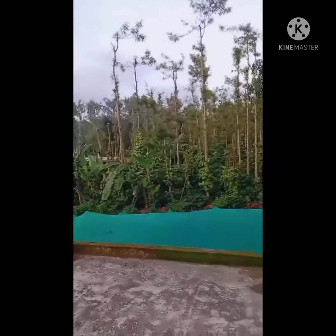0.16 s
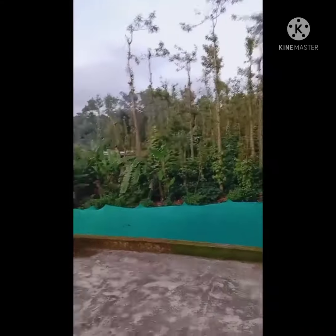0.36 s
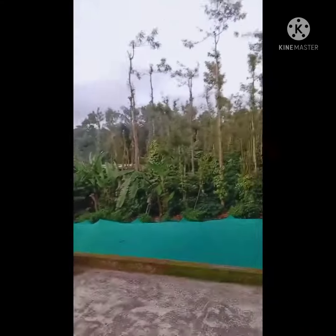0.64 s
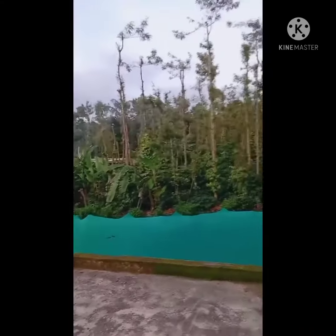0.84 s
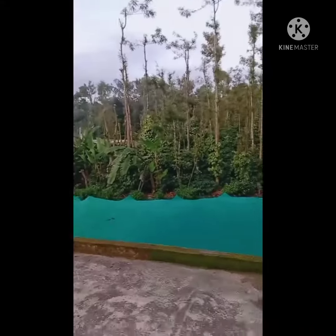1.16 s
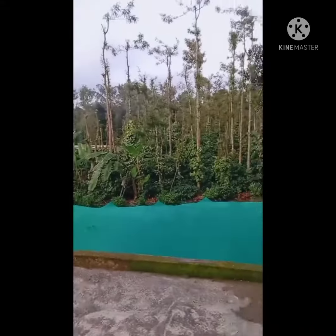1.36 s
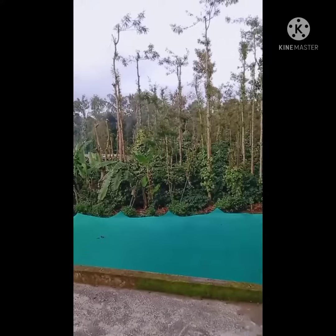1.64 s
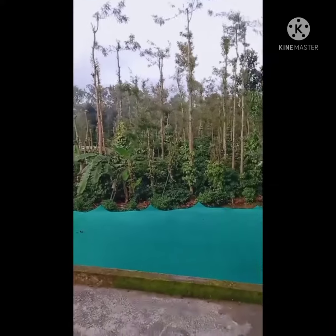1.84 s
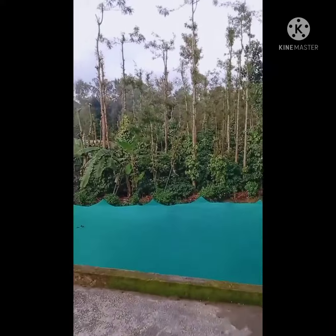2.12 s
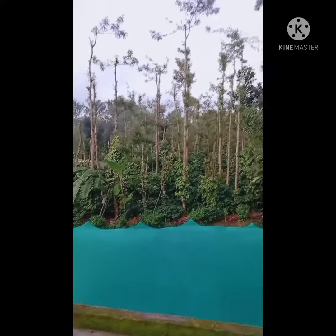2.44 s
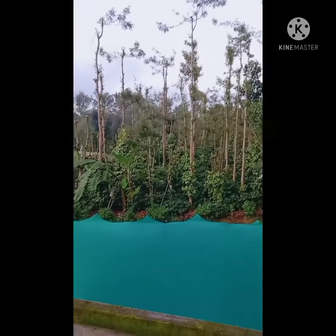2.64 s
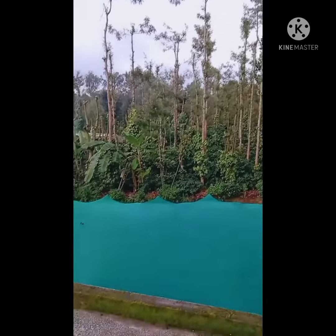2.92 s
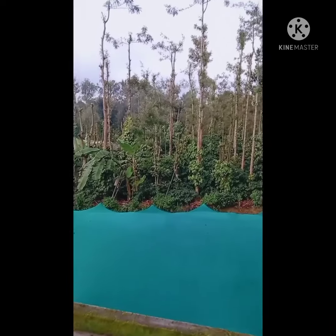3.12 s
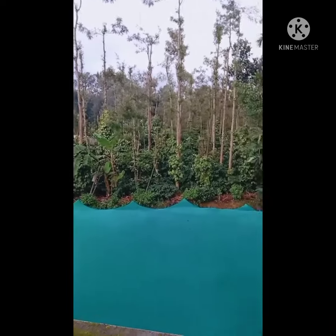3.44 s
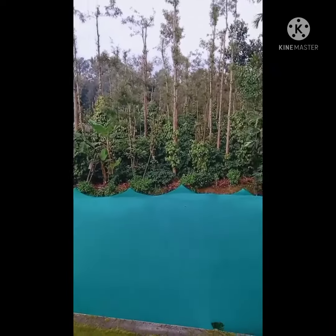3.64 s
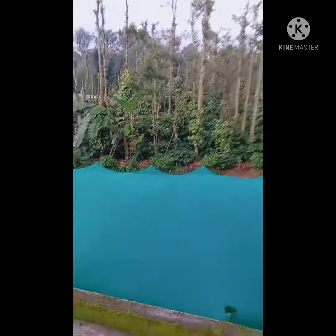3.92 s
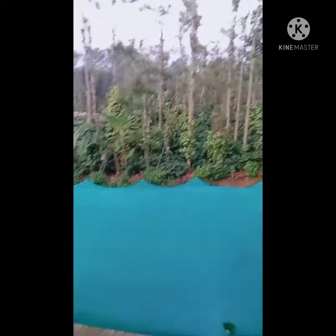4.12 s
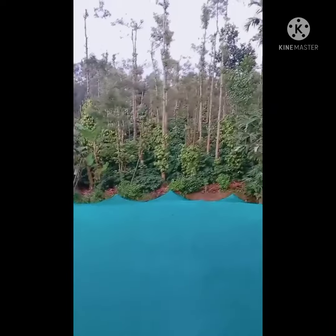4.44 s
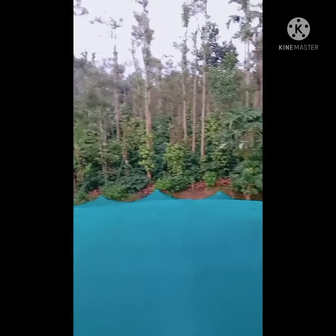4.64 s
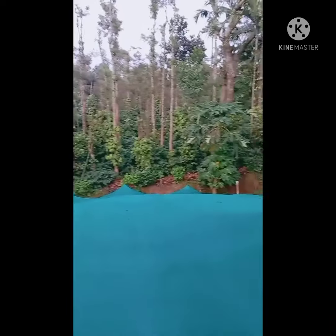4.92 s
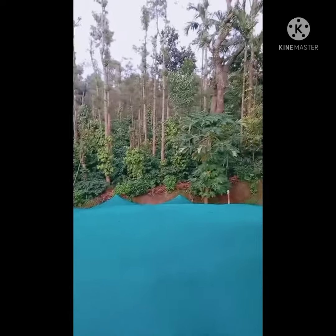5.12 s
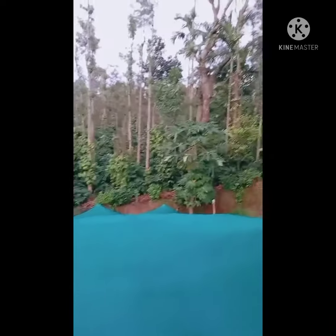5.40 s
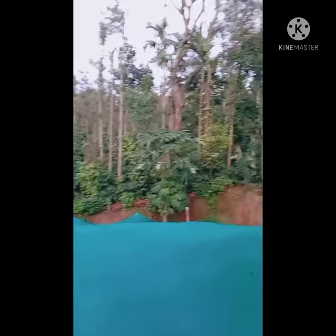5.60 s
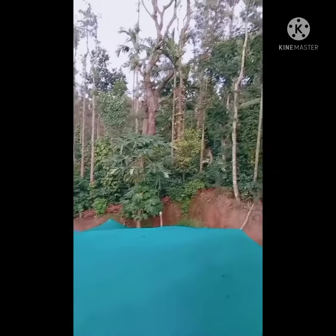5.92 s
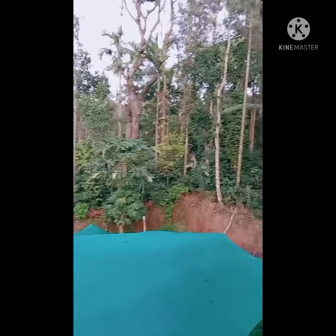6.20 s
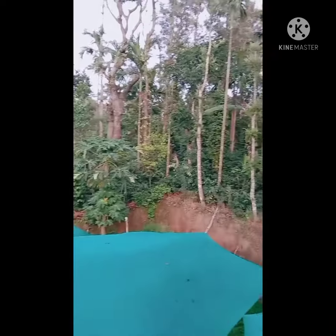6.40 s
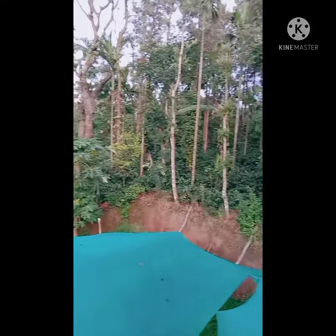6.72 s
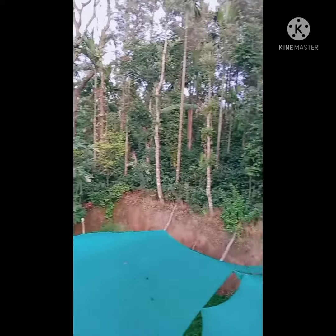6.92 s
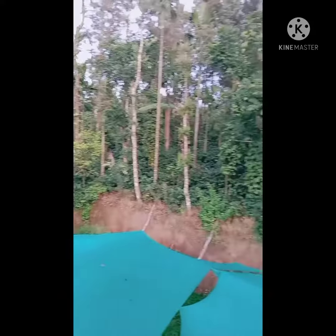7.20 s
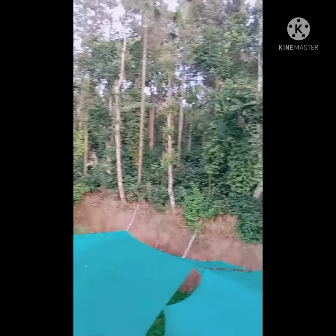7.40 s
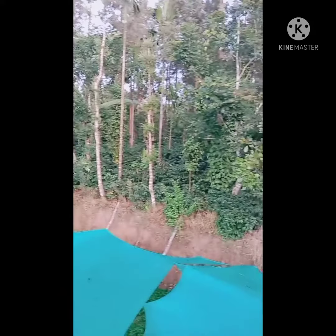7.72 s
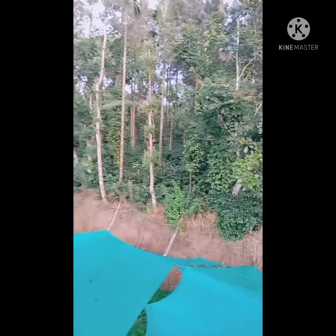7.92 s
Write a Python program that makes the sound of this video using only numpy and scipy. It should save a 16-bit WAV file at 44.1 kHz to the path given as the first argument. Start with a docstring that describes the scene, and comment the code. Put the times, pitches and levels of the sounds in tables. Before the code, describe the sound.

A steady, high-pitched insect chorus shrills outdoors, with a few low muffled thumps of wind and handling on the microphone.

```python
"""Insect chorus at dusk in trees around a yard, heard through one microphone of a hand-held phone.
Four crowds click into their body resonances, from low to very high; two narrow voices stand out.
A finger slides off the port at the start; gusts and the grip buffet the port in low thumps.
Faint far hoots, light finger taps on the case and two sharp ticks come through."""
import sys
import numpy as np
from scipy import signal
from scipy.fft import rfft, irfft, next_fast_len
from scipy.io import wavfile
from scipy.ndimage import uniform_filter1d

SR = 44100
rng = np.random.default_rng(int(sys.argv[2]) if len(sys.argv) > 2 else 0)


def unload_audio(sound):
    """Save the sound as a 16-bit wav file, at the path given as the first command line argument."""
    columns = np.transpose(np.atleast_2d(sound))
    # keep every value between -1 and 1, then stretch to whole-number steps
    steps = np.round(np.clip(columns, -1, 1) * 32767)
    wavfile.write(sys.argv[1], SR, steps.astype(np.int16))


N = 355093

# lower middle crowd, throbbing and swelling as the phone turns to the trees: (time [s], level [dB])
LOWER_MID_LEVELS = [(0.42, -28), (0.82, -34.5), (1.52, -32.5), (1.59, -34.5), (2.39, -32.5), (2.5, -25.5),
                    (2.54, -30.5), (3.46, -31), (3.48, -33), (3.61, -26.5), (3.63, -32.5), (3.99, -33),
                    (4.09, -26), (4.58, -32.5), (4.73, -27.5), (4.75, -30), (5.11, -32.5), (5.31, -29),
                    (7.71, -28), (7.81, -30.5), (8.01, -26), (8.05, -28.5)]


def from_db(db):
    return 10 ** (np.asarray(db) / 20)


def unit_rms(x):
    return x / np.sqrt(np.mean(x ** 2) + 1e-20)


def curves(rows):
    """Rows of (time [s], values...) to one per-sample curve per value column."""
    times_s, *columns = np.transpose(rows)
    return [np.interp(np.arange(N) / SR, times_s, column) for column in columns]


def at_hz(rows, hz, column=1):
    rows = np.array(rows)
    return np.interp(np.log(hz), np.log(rows[:, 0]), rows[:, column])


def butter(x, order, hz, kind):
    return signal.sosfilt(signal.butter(order, hz, kind, fs=SR, output="sos"), x)


def drift(rate_hz):
    """Slow random wander, unit RMS."""
    step, settle = 40, 2000
    pole = np.exp(-2 * np.pi * rate_hz * step / SR)
    noise = rng.standard_normal(N // step + settle + 2)
    slow = signal.lfilter([1], [1, -2 * pole, pole * pole], noise)[settle:]
    return np.interp(np.arange(N) / step, np.arange(len(slow)), unit_rms(slow))


def coloured(x, spectrum):
    """FFT of x shaped by the table, and the bin frequencies."""
    size = next_fast_len(N)
    hz = np.maximum(np.arange(size // 2 + 1) * SR / size, 1)
    return rfft(x, size) * from_db(at_hz(spectrum, hz)), hz


def ring(drive, hz, t60_s):
    """Resonator: a unit click starts a decaying unit sine."""
    radius, angle = from_db(-60 / (t60_s * SR)), 2 * np.pi * hz / SR
    return signal.lfilter([0, np.sin(angle)], [1, -2 * radius * np.cos(angle), radius ** 2], drive + 1e-18)


def swell(start_s, hold_s, db, rise_db_per_s, fall_db_per_s):
    """Rise to start_s, hold, fall; linear in dB."""
    t = np.arange(N) / SR - start_s
    return from_db(db - rise_db_per_s * np.maximum(-t, 0) - fall_db_per_s * np.maximum(t - hold_s, 0))


def swing(t, hz, width_cycles):
    """Rounded sine pulse centred one cycle in."""
    onset = np.sin(np.pi / 2 * np.minimum(t * hz * 1.5, 1)) ** 2
    bell = np.exp(-((t * hz - 1) / width_cycles) ** 2)
    return onset * bell * np.sin(2 * np.pi * hz * t + rng.uniform(0, 2 * np.pi))


def covered(lag_s):
    # finger over the port: (time [s], cover [0-1])
    cover = [(0, 0.93), (.24, 0.97), (.31, 0.62), (.345, 0.42), (.38, .0), (9, 0.02)]
    return np.interp(np.arange(N) / SR - lag_s, *np.transpose(cover))


def clicking(count, clicks_per_s, spread_db, blur):
    """Each insect clicks at its own uneven rate and distance; far ones blur into hiss."""
    out, beats = np.zeros(N), int(1.3 * clicks_per_s * N / SR)
    for _ in range(count):
        gaps = SR / clicks_per_s * rng.uniform(.85, 1.15) * (1 + .06 * rng.standard_normal(beats))
        at = (np.cumsum(gaps) - gaps[0] * rng.random()).astype(int)
        at = at[at < N]
        out[at] += from_db(spread_db * rng.standard_normal()) * rng.standard_normal(len(at))
    return unit_rms(unit_rms(out) + blur * rng.standard_normal(N))


def crowd(clicks, spectrum, level_db, patchy_db, flicker_db):
    """Clicks through body resonances; each third octave swells alone and is muffled by the finger."""
    # covered port: (frequency [Hz], loss [dB], clearing lag [s])
    cover_loss = [(990, 5.2, 0.012), (2490, 7.8, 0), (3350, 12.4, .0), (3900, 43, 0), (5030, 31, 0),
                  (6300, 52, 0.053), (7300, 58, 0.084), (10000, 27, 0.033), (15000, 42, .085)]
    low_hz, high_hz = spectrum[0][0], spectrum[-1][0]
    shaped, hz = coloured(clicks, spectrum)
    shaped[(hz < low_hz) | (hz > high_hz)] = 0
    rms = np.sqrt(np.mean(irfft(shaped)[:N] ** 2))
    out = 0
    for third in np.arange(3 * np.log2(low_hz), 3 * np.log2(high_hz) + 1):
        centre_hz = 2 ** (third / 3)
        window = np.cos(np.pi / 2 * np.clip(3 * np.log2(hz) - third, -1, 1)) ** 2
        lag_s = at_hz(cover_loss, centre_hz, column=2)
        loss_db = covered(lag_s) * at_hz(cover_loss, centre_hz)
        out += irfft(shaped * window)[:N] * from_db(patchy_db * drift(9) - loss_db)
    return from_db(level_db + flicker_db * drift(14.5)) * out / rms


def chorus():
    """Four clicking crowds; the lower two share clicks, as do the high one and its lower skirt."""
    # body resonances: (frequency [Hz], density [dB])
    low_body = [(800, -53), (1000, -42.5), (1210, -36), (1350, -23), (1710, -8.5), (2350, -5.5), (2600, -5),
                (2800, -19.5), (3100, -31)]
    lower_mid_body = [(2450, -18), (2750, -8), (3000, -6), (3240, -4), (3700, -11.5), (4100, -17),
                      (4700, -38.5)]
    upper_mid_body = [(3600, -22), (4000, -13.5), (4400, -6.5), (4900, 0), (5810, -0.5), (6510, -9.5),
                      (7270, -12.5), (8140, -23), (10400, -31.5), (10900, -40.5), (12000, -39)]
    high_body = [(12800, -30), (13600, -21), (14100, -8), (14700, -3), (15150, 1), (15450, 4), (16000, -5)]
    skirt_body = [(10500, -26.5), (11200, -16.5), (12000, -4.5), (13000, 0), (13800, 0), (14600, -14)]
    # crowd loudness: (time [s], level [dB])
    low_levels = [(0.42, -30), (0.74, -34), (1.97, -33.5), (2.01, -33), (2.27, -36), (2.31, -31),
                  (2.39, -32.5), (4.31, -33.5), (7.99, -31), (8.05, -31.5)]
    upper_mid_levels = [(0.42, -26.5), (0.61, -34.5), (0.69, -29), (0.8, -32.5), (1.14, -30), (1.95, -32.5),
                        (2.03, -27), (2.27, -31.5), (2.52, -28.5), (2.61, -33.5), (2.67, -30),
                        (3.46, -27.5), (3.52, -32.5), (3.69, -29.5), (3.88, -31), (4.24, -25.5),
                        (4.33, -29), (5.2, -27.5), (5.31, -24.5), (5.41, -27), (6.22, -25.5), (6.33, -22.5),
                        (6.39, -26.5), (6.86, -25), (7.73, -25), (8.05, -24)]
    # high crowd: (time [s], level [dB], skirt re level [dB])
    high_levels = [(0.47, -52, -5), (0.53, -43, -10), (0.79, -64, -7), (0.93, -46, -13), (0.96, -54, -16),
                   (1.1, -44.5, -12), (1.46, -41.5, -10), (1.61, -38.5, -19), (2.39, -41.5, -13),
                   (2.52, -56, -15), (2.69, -50, -16), (3.4, -44, -12), (3.51, -52, -8), (3.57, -49, -20),
                   (3.78, -47, -12), (3.99, -41.5, -16), (4.27, -40.5, -15), (4.29, -45, -9),
                   (4.69, -40, -15), (5.22, -38, -11.5), (5.45, -41.5, -12), (6.49, -40, -12.5),
                   (7.4, -41, -9.5), (8.05, -40, -11)]
    # skirt flickers hard, then steadies: (time [s], depth [dB])
    skirt_flicker = [(0, 3.5), (4.7, 3), (5.3, 0.5), (8.05, 1)]
    high_db, skirt_db = curves(high_levels)
    low_clicks = clicking(count=30, clicks_per_s=130, spread_db=4.5, blur=1.8)
    high_clicks = clicking(count=14, clicks_per_s=240, spread_db=1, blur=1.5)
    out = crowd(low_clicks, low_body, curves(low_levels)[0], patchy_db=1.7, flicker_db=.57)
    out += crowd(low_clicks, lower_mid_body, curves(LOWER_MID_LEVELS)[0], patchy_db=1.13, flicker_db=.72)
    mid_clicks = clicking(count=30, clicks_per_s=250, spread_db=1.5, blur=1.84)
    out += crowd(mid_clicks, upper_mid_body, curves(upper_mid_levels)[0], patchy_db=1, flicker_db=.68)
    out += crowd(high_clicks, high_body, high_db, patchy_db=-.7, flicker_db=-.5)
    out += crowd(high_clicks, skirt_body, high_db + skirt_db,
                 patchy_db=1, flicker_db=curves(skirt_flicker)[0])
    return out


def narrow_band(hz, level_db, width_hz, throb_db, throb_hz=12):
    """Throbbing narrow noise on a fixed or moving centre."""
    baseband = butter(rng.standard_normal((2, N)), 2, width_hz / 2, "low")
    phase = 2 * np.pi * np.cumsum(hz + np.zeros(N)) / SR
    tone = unit_rms(baseband[0] * np.cos(phase) + baseband[1] * np.sin(phase))
    return tone * from_db(level_db + throb_db * drift(throb_hz))


def near_insects():
    """Two voices: the loud one wanders in pitch, the thin one swells with the lower middle crowd."""
    # loud voice: (time [s], level [dB])
    loud_levels = [(0.42, -36), (0.87, -39.5), (1.2, -32), (1.88, -35), (1.91, -31), (2.08, -28.5),
                   (2.12, -43), (2.29, -29.5), (2.33, -44), (2.39, -31), (2.52, -42), (2.63, -29),
                   (2.76, -36), (3.31, -29.5), (3.84, -35.5), (4.16, -26), (4.31, -37), (4.52, -27.5),
                   (4.67, -44), (4.78, -29.5), (4.88, -36), (5.31, -30), (7.22, -29), (7.26, -24.5),
                   (7.49, -31), (8.05, -28.5)]
    cover_db = 9.5 * covered(0)
    loud_hz = 2646 + 25.04 * drift(2)
    loud = narrow_band(loud_hz, curves(loud_levels)[0] - cover_db, width_hz=88, throb_db=1.2, throb_hz=11)
    crowd_db = curves(LOWER_MID_LEVELS)[0]
    thin_db = -37.5 + 1.3 * (crowd_db - crowd_db.mean()) - cover_db
    return loud + narrow_band(2927, thin_db, width_hz=59, throb_db=1.5)


def finger_leaks():
    """Gaps beside the covering finger pass thin bands of the chorus."""
    # gap bands: (centre [Hz], level [dB])
    bands = [(3650, -60), (4780, -63.5), (5480, -66.5), (6400, -78.5)]
    return covered(lag_s=.03) * sum(narrow_band(hz, db, width_hz=70, throb_db=.5) for hz, db in bands)


def background():
    """Faint, wavering low noise."""
    # noise floor: (frequency [Hz], density [dB])
    spectrum = [(15, -22), (30, -13.5), (69, -7.5), (189, -13.5), (266, -14), (412, -16.5), (551, -16),
                (1200, -16), (1560, -24), (2640, -120)]
    level = from_db(-71.5 + 1.2 * drift(2.5))
    shaped, _ = coloured(rng.standard_normal(N), spectrum)
    return level * unit_rms(irfft(shaped)[:N])


def finger_scrape():
    """Stick-slip: short hollow rasps over a weaker rub."""
    # finger slips: (time [s], level [dB])
    slips = [(.008, -47), (.071, -41), (.204, -59), (0.233, -40), (.249, -46.5), (0.281, -36), (.295, -50),
             (.333, -55), (.351, -28), (.385, -42)]
    times_s, db = np.transpose(slips)
    impulses = np.zeros(N)
    impulses[(times_s * SR).astype(int)] = from_db(db)
    pole = np.exp(-1 / (.0026 * SR))
    bursts = signal.lfilter([1 - pole], [1, -2 * pole, pole * pole], impulses) * np.e
    rub = swell(start_s=.36, hold_s=0, db=-39, rise_db_per_s=249, fall_db_per_s=175)
    rasp = butter(rng.standard_normal(N), 3, [380, 1150], "band")
    return (rub + bursts) * unit_rms(rasp)


def gust_rumble():
    """Turbulence at the port: lumpy low noise, duller in weak gusts."""
    # air at the port: (time [s], hold [s], drive [dB])
    gusts = [(.01, 0.01, -26.5), (0.077, 0.016, -32.5), (.1, .09, -51), (0.836, 0.018, -22.5),
             (0.965, 0.12, -23), (1.128, .13, -37.5), (1.3, .09, -71), (2.914, 0.037, -29),
             (3.028, 0.017, -35), (3.142, .07, -44.5), (3.36, 0.083, -50.5), (3.497, .07, -45),
             (3.6, .07, -61), (4.361, 0.13, -21), (4.53, 0.037, -34.5), (4.623, .14, -28),
             (4.802, 0.058, -50), (4.878, .08, -59), (5.82, .09, -40), (5.95, 0.047, -26.5),
             (6.059, 0.051, -24), (6.15, .15, -39.5), (6.372, 0.049, -51), (7.667, .015, -58),
             (7.82, 0.042, -58.5), (7.91, .08, -57)]
    # turbulence: (frequency [Hz], density [dB])
    spectrum = [(15, -45.5), (25, -27), (70, 1), (123, 0), (197, -7.5), (339, -28), (461, -36), (522, -37),
                (700, -55.5), (910, -79), (1540, -120)]
    split_hz, full_bright_db, dulling = 190, -28, .4
    level = sum(swell(*gust, rise_db_per_s=797, fall_db_per_s=447) for gust in gusts)
    lumps = rng.standard_normal(N) * level * from_db(-5.5 + 4.3 * drift(28))
    shaped, hz = coloured(lumps, spectrum)
    steady, _ = coloured(rng.standard_normal(N), spectrum)
    lowpass = 1 / (1 + (hz / split_hz) ** 6)
    deep, top = irfft(shaped * lowpass)[:N], irfft(shaped * (1 - lowpass))[:N]
    brightness = np.minimum(uniform_filter1d(level, size=800) / from_db(full_bright_db), 1) ** dulling
    return (deep + brightness * top) / np.sqrt(np.mean(irfft(steady) ** 2))


def port_thumps():
    """Each push swings the diaphragm low, with a shorter, higher snap at its front."""
    # pushes: (time [s], swing drive [dB], swing [Hz], snap drive [dB])
    pushes = [(0.01, -21.5, 109, -40), (0.072, -28, 79, -29.5), (0.205, -22, 98, -40),
              (0.234, -17, 180, -35), (0.249, -15.5, 168, -37), (0.286, -24, 86.1, -29.5),
              (0.318, -38, 99.6, -30.5), (0.336, -20, 180, -37), (0.351, -26, 144, -30),
              (0.383, -32, 148, -30), (0.83, -22, 130, -49), (0.845, -19, 118, -36),
              (0.974, -19, 99.6, -34), (0.999, -10.5, 141, -29.5), (1.074, -23, 93, -34),
              (1.234, -26, 80.7, -52), (2.924, -22, 102, -65), (3.023, -25, 110, -68),
              (3.361, -33, 79, -72), (3.492, -31, 104, -72), (3.547, -29, 75.4, -75), (4.317, -25, 99, -58),
              (4.36, -21, 94.2, -30.5), (4.444, -23.5, 112, -44), (4.496, -9, 112, -37),
              (4.631, -21, 137, -54), (4.644, -14, 96.9, -52), (4.679, -12, 145, -29.5),
              (4.735, -22, 72.7, -48), (4.789, -27, 92, -74), (5.818, -28, 98, -68),
              (5.959, -20.5, 148, -37), (6.079, -28, 110, -39), (6.188, -24, 102, -66),
              (6.279, -27, 98, -74), (7.965, -36, 119, -83)]
    out, t = np.zeros(N + SR), np.arange(SR // 10) / SR
    for time_s, db, hz, snap_db in pushes:
        thump = from_db(db - 2.8) * swing(t, hz, width_cycles=.6)
        snap = from_db(snap_db + 1) * swing(t, hz=308, width_cycles=1)
        start = max(round((time_s - .003) * SR), 0)
        out[start:start + len(t)] += thump + snap
    return out[:N]


def far_hoots():
    """Hoarse, slightly gliding notes, perhaps birds."""
    # hoots: (time [s], length [s], first pitch [Hz], last pitch [Hz], level [dB])
    notes = [(0.528, 0.064, 600, 583, -55), (0.77, 0.35, 480, 512, -59.5), (2.016, 0.12, 520, 524, -67),
             (2.172, 0.095, 517, 430, -63.5), (5.753, 0.27, 970, 990, -56.5),
             (5.847, 0.28, 722, 770, -58.5), (6.157, 0.096, 754, 740, -55), (6.407, .07, 705, 684, -65),
             (7.04, 0.089, 440, 460, -67.5), (7.157, 0.13, 653, 750, -60), (7.303, 0.15, 716, 733, -62.5),
             (7.687, .07, 697, 705, -66)]
    out, t, fade_s = 0, np.arange(N) / SR, .055
    for start_s, length_s, first_hz, last_hz, db in notes:
        end_s = start_s + length_s
        fade = np.clip(np.minimum(t - start_s, end_s - t) / fade_s + .5, 0, 1)
        hz = np.interp(t, [start_s, end_s], [first_hz, last_hz])
        out += fade * narrow_band(hz, db, width_hz=85, throb_db=3, throb_hz=18)
    return out


def case_taps():
    """Fingers tap the case: a noise puff into a hollow, damped resonance."""
    # taps: (time [s], peak [dB], resonance [Hz])
    taps = [(0.58, -36.5, 770), (1.74, -63, 238), (2.294, -39, 513), (2.33, -50, 478), (2.427, -61, 114),
            (5.324, -46.5, 505), (5.4, -59, 520), (7.07, -55, 252)]
    out, t = np.zeros(N + SR), np.arange(SR // 5) / SR
    for time_s, db, hz in taps:
        puff = rng.standard_normal(len(t)) * t * np.exp(-t / .0055)
        knock = ring(ring(puff, hz, t60_s=2.8 / hz), hz, t60_s=19 / hz)
        start = round(time_s * SR)
        out[start:start + len(t)] += from_db(db) * knock / np.max(np.abs(knock))
    return out[:N]


def sharp_ticks():
    """Single clicks into a bright resonance that dies at once."""
    # ticks: (time [s], drive [dB], resonance [Hz])
    ticks = [(2.272, -30, 8600), (5.2852, -19, 14380)]
    out = np.zeros(N)
    for time_s, db, hz in ticks:
        click = np.zeros(N)
        click[round(time_s * SR)] = from_db(db)
        out += ring(ring(click, hz, t60_s=.0008), hz, t60_s=.0018)
    return butter(out, 2, 6000, "high")


def scene():
    mono = chorus() + background() + near_insects() + finger_leaks() + far_hoots()
    mono += gust_rumble() + port_thumps() + finger_scrape() + case_taps() + sharp_ticks()
    fade_in = np.minimum(np.arange(N) / (.005 * SR), 1)
    return np.array([mono, mono]) * fade_in


def record(dry):
    """Microphone: faint hiss, bass roll-off, steep top cut."""
    hiss_db, low_cut_hz, high_cut_hz = -92, 50, 15490
    hissy = dry + from_db(hiss_db) * rng.standard_normal(N)
    thinned = butter(hissy, 2, low_cut_hz, "high")
    return signal.sosfilt(signal.ellip(14, .3, 85, high_cut_hz, fs=SR, output="sos"), thinned)


dry = scene()
out = record(dry)
unload_audio(out)
```